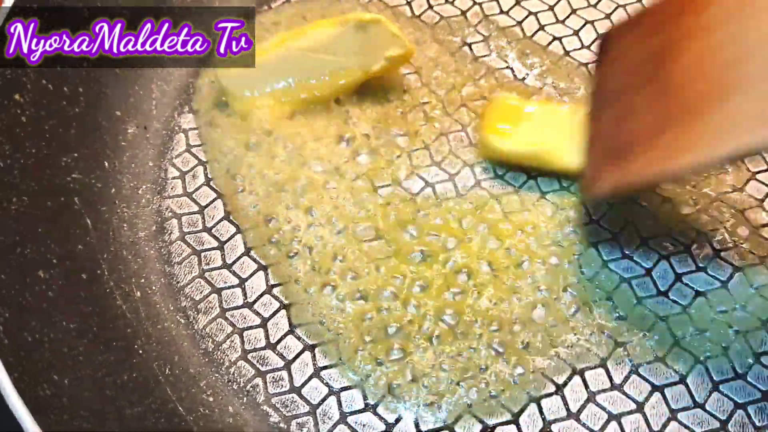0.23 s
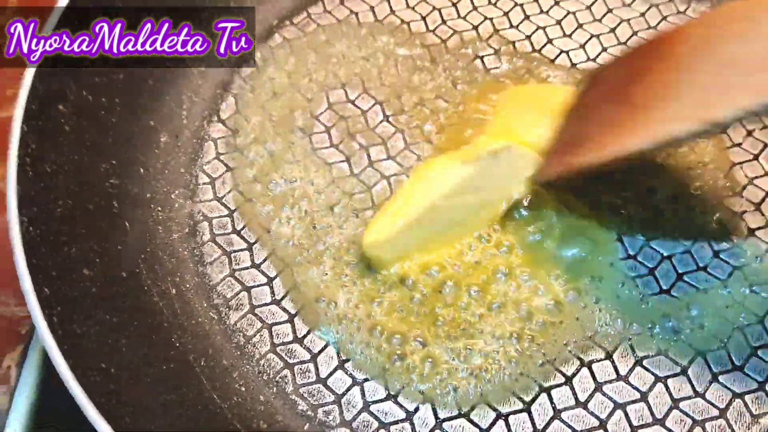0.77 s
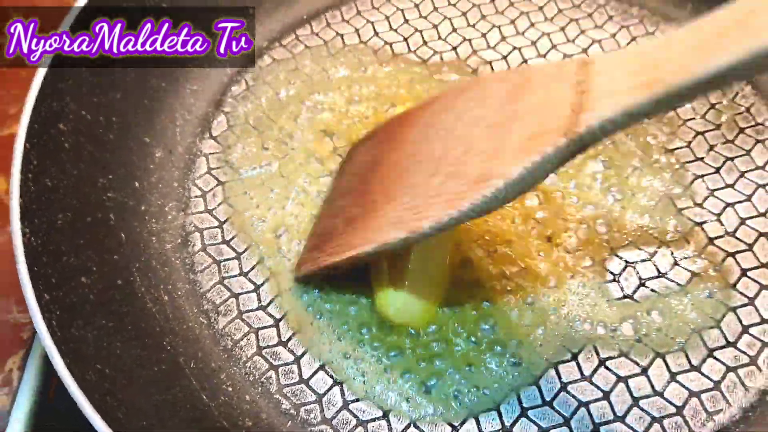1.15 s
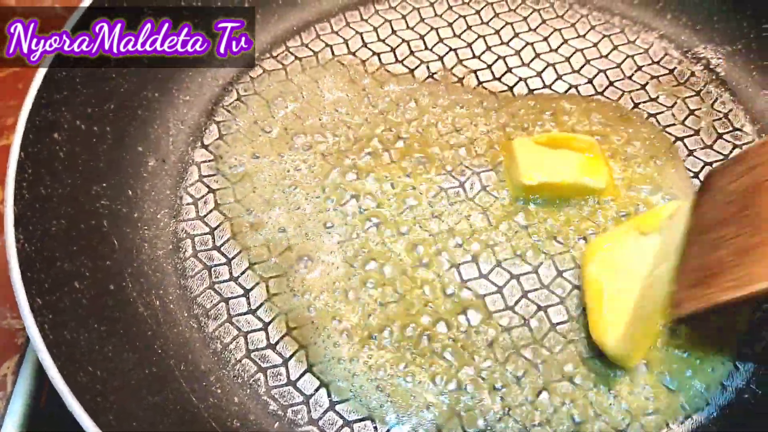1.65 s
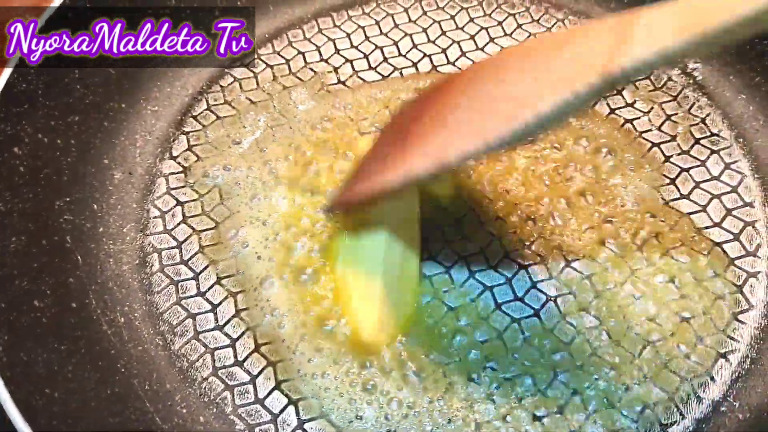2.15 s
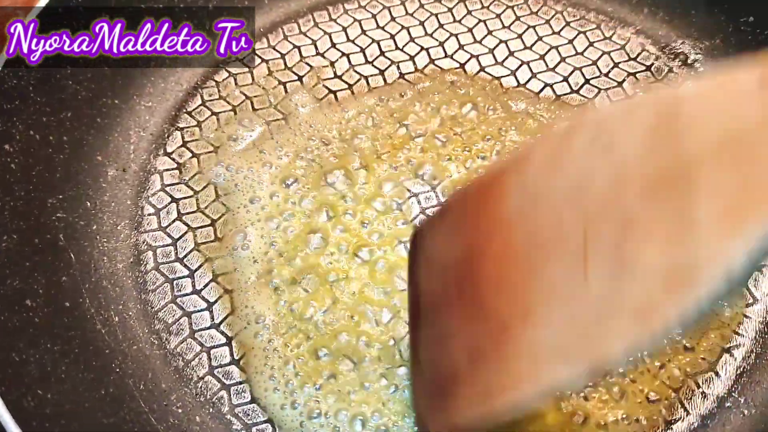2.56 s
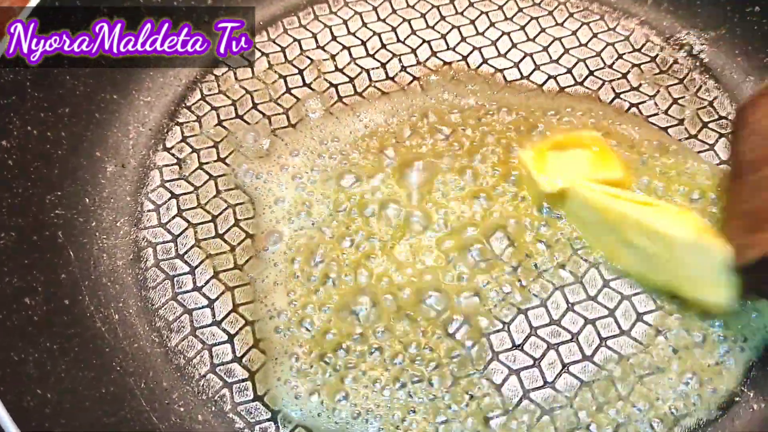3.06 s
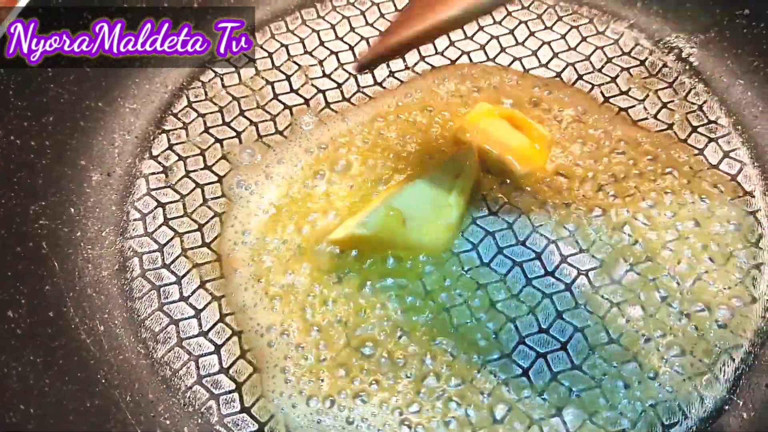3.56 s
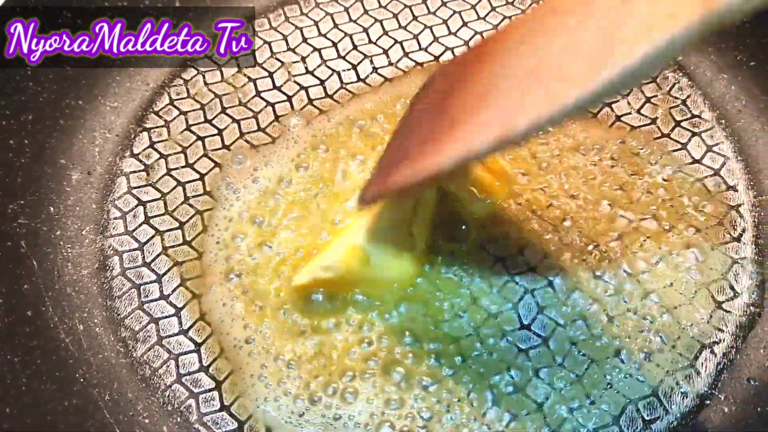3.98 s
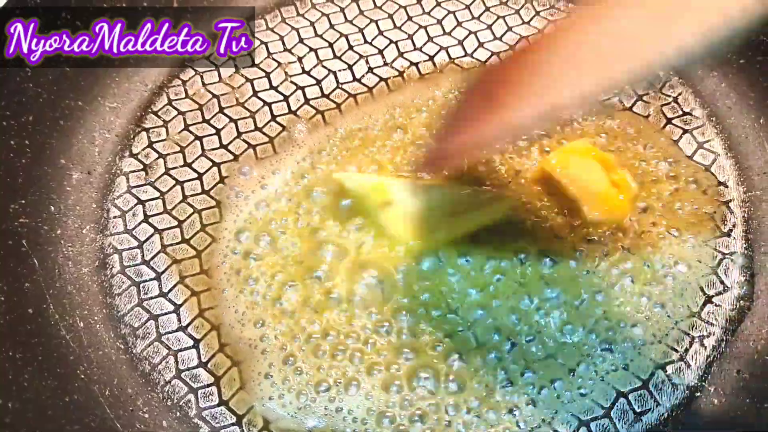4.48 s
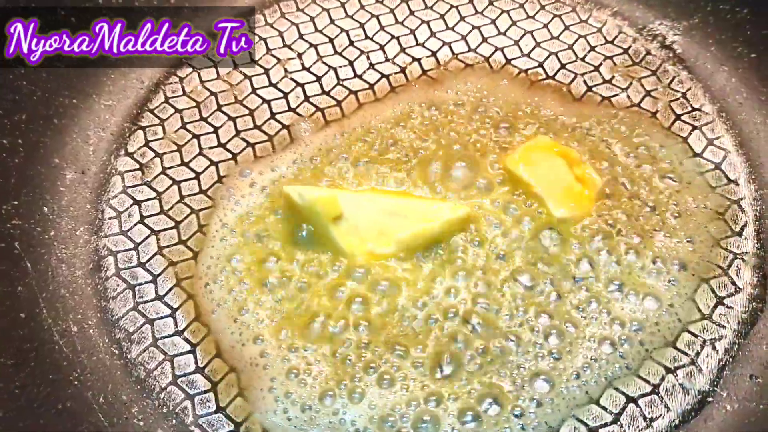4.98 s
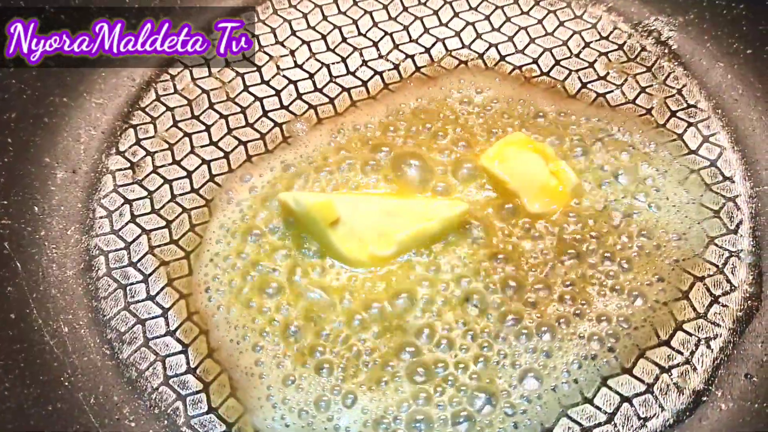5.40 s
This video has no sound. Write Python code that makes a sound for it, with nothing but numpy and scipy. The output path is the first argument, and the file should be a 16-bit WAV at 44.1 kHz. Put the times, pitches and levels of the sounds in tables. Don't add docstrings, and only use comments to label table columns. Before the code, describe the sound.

Butter sizzles loudly in a hot pan, gradually calming, while a wooden spatula rubs the metal and fat bubbles pop and spit.

```python
import sys
import numpy as np
from scipy import signal
from scipy.fft import rfft, irfft, next_fast_len
from scipy.io import wavfile
from scipy.ndimage import uniform_filter1d

SR = 44100
rng = np.random.default_rng(int(sys.argv[2]) if len(sys.argv) > 2 else 0)


def volts_from_db(level):
    exponent = np.asarray(level, float) / 20
    return 10 ** exponent


def master_out(mix):
    frames = np.transpose(np.atleast_2d(mix))
    ceiling = np.clip(frames, -1, 1)
    pcm = np.round(ceiling * 32767).astype(np.int16)
    wavfile.write(sys.argv[1], SR, pcm)


N = 248283
TIME_S = np.arange(N) / SR
LONG = next_fast_len(N)
HZ = np.fft.rfftfreq(LONG, 1 / SR)

# time in seconds, level in dB.
BOIL = [(0.03, -23.5), (0.44, -27), (1.05, -27.5), (1.3, -29), (1.5, -30), (1.76, -23.5), (1.92, -28),
        (2.17, -26), (2.34, -25), (2.45, -29), (2.8, -26.5), (3.2, -27.5), (3.55, -28), (4.02, -31),
        (4.33, -33.5), (4.73, -30), (4.85, -31.5), (5.63, -34)]
FULL_BOIL_DB = -24
# frequency in Hz, width in Hz, level in dB.
PAN_MODES = [(684.4, 38, -1), (609, 60, -17.5), (852, 79, 1.5), (1052, 73, 1.5), (1207, 130, -0.5),
             (1410, 450, -0.5), (1920, 180, 4.5)]


def evened(x):
    return x / np.sqrt(np.mean(x ** 2) + 1e-20)


def read(points, hz):
    f, value = np.transpose(points)
    return np.interp(np.log(hz + 1), np.log(f + 1), value)


def level_curve(rows):
    s, db = np.transpose(rows)
    return np.interp(TIME_S, s, db)


def hump(start, length, rise, fade):
    t = TIME_S - start
    return np.clip(t / rise, 0, 1) * np.exp(-np.maximum(t - length, 0) / fade)


def inside(rows, fade=0.02):
    edges = np.minimum(TIME_S - rows[0][0], rows[-1][0] - TIME_S) / fade
    return volts_from_db(level_curve(rows)) * np.clip(edges + 1.5, 0, 1)


def wander(count):
    return evened(uniform_filter1d(uniform_filter1d(rng.standard_normal(N), count), count))


def band(x, lo_hz, hi_hz):
    return signal.sosfilt(signal.butter(2, [lo_hz, hi_hz], "band", fs=SR, output="sos"), x)


def colour(x, db_at):
    hz = abs(np.fft.fftfreq(4096, 1 / SR))
    log_gain = np.log(volts_from_db(np.maximum(db_at(hz), -100)))
    taps = np.fft.ifft(np.exp(np.conj(signal.hilbert(log_gain)))).real[..., :2048]
    return signal.oaconvolve(x, np.atleast_2d(taps), axes=1)[:, :N]


def pair():
    # frequency in Hz, left-right likeness from 0 to 1.
    likeness = [(40, .97), (100, .92), (210, .93), (350, .76), (700, .55), (1300, .2), (3000, 0)]
    a, b = rfft(rng.standard_normal((2, LONG)))
    same = np.clip(read(likeness, HZ), -1, 1)
    return irfft(np.array([a, same * a + np.sqrt(1 - same ** 2) * b]), LONG)[:, :N]


def ring(x, modes):
    total = 0
    for hz, width_hz, db in modes:
        resonance = signal.lfilter(*signal.iirpeak(hz, hz / width_hz, SR), x)
        total = total + volts_from_db(db) * np.sqrt(1 / width_hz) * resonance
    return evened(total)


def scrape(modes, per_s, rough_db):
    slips = volts_from_db(rough_db * rng.exponential(1, N)) * (rng.random(N) < per_s / SR)
    return ring(pair() * (0.28 + evened(uniform_filter1d(slips, 30))), modes)


def pressure():
    # start in seconds, length in seconds, pressure in dB.
    strokes = [(-.05, 0.16, -34), (0.186, 0.28, -38.5), (0.49, .2, -37.5), (0.723, 0.13, -48),
               (0.918, 0.35, -41), (1.4, 0.14, -44), (1.574, 0.27, -36.5), (1.98, 0.21, -41.5),
               (2.304, 0.14, -43.5), (2.51, 0.37, -44), (2.748, 0.05, -42.5), (2.95, 0.28, -49),
               (3.45, 0.074, -43), (4.105, 0.15, -50), (4.504, 0.076, -49)]
    resting_db = -56.5
    return volts_from_db(resting_db) + sum(volts_from_db(db) * hump(s, length, rise=0.035, fade=0.1) for s, length, db in strokes)


def bursts(per_s, spread_db, lo_hz, hi_hz, cycles, count=16):
    size = volts_from_db(spread_db * np.minimum(rng.exponential(1, N), 3.6)) * rng.choice([-1, 1], N)
    size *= rng.random(N) < per_s / SR
    size /= np.sqrt(uniform_filter1d(size ** 2, 6000))
    patch = rng.integers(0, count, N)
    out, t, power = np.zeros((2, N)), np.arange(300) / SR, 1e-3
    for k, hz in enumerate(np.linspace(lo_hz, hi_hz, count)):
        turns = hz * t * (1 + 0.019 * hz * t)
        pop = np.sin(2 * np.pi * turns) * np.exp(-turns / cycles) * (1 - np.exp(-turns))
        pop /= np.linalg.norm(pop)
        power = power + abs(rfft(pop, LONG)) ** 2
        sound = signal.oaconvolve(size * (patch == k), pop)[:N]
        out += [sound, np.roll(sound, rng.integers(-30, 31))]
    return evened(irfft(rfft(out, LONG) / np.sqrt(power), LONG)[:, :N])


def bowl(x, t60, db):
    keep = volts_from_db(-120 / (t60 * SR))
    power = signal.lfilter([1 - keep], [1, -keep], x ** 2)
    return x + volts_from_db(db) * np.sqrt(power) * rng.standard_normal(x.shape)


def ports(x):
    # frequency in Hz, density in dB per Hz.
    cavity = [(880, -32.5), (1500, -12.5), (1740, -15.5), (3120, -7.5), (4780, -7.5), (5760, -8),
              (6790, 1.5), (10900, -10), (13300, -13), (14800, -11.5), (15400, -7.5)]
    # frequency in Hz, left-right difference in dB.
    balance = [(1500, -1), (4200, 0), (5500, 3), (6500, 8.5), (8000, 4), (10500, 5), (12000, 4),
               (13500, 12), (15400, 16.5)]
    return colour(x, lambda hz: read(cavity, hz) + np.outer([0.5, -0.5], read(balance, hz)))


def split(x, low_hz, high_hz):
    low = 1 / (1 + (HZ / low_hz) ** 20)
    high = 1 - 1 / (1 + (HZ / high_hz) ** 10)
    return [evened(irfft(rfft(x, LONG) * share, LONG)[:, :N]) for share in (low, 1 - low - high, high)]


def patchy(x, db):
    spectra = signal.stft(x, nperseg=512)[2]
    field = rng.standard_normal(spectra.shape[1:])
    field = evened(uniform_filter1d(uniform_filter1d(field, size=5, axis=0), size=10, axis=1))
    return evened(signal.istft(spectra * volts_from_db(db * field), nperseg=512)[1][:, :N])


def sizzle():
    # time in seconds, depth in dB.
    shading = [
        (1.16, 1),
        (2.19, 6),
        (2.875, 4),
        (3.93, -0.5),
        (4.98, -1),
    ]
    boil_db = level_curve(BOIL)
    level_db = boil_db - sum(db * hump(s, 0.0099, rise=0.0099, fade=0.12) for s, db in shading)
    top_db = 9 - 1.02 * TIME_S
    spread_db = 0.5 + 0.37 * (FULL_BOIL_DB - boil_db) + 0.2 * TIME_S
    stir_db = 2.5 * pressure() / pressure().max()
    froth_db = -34.5 + 0.77 * (level_db - FULL_BOIL_DB) + stir_db - 0.39 * TIME_S

    fizz = bursts(6000, np.clip(spread_db, 0, 7), lo_hz=1780, hi_hz=16420, cycles=1.7)
    hiss = 0.41 * rng.standard_normal((2, N))
    fizz = ports(bowl(fizz, t60=0.079, db=-0.5) + hiss)
    froth, body, top = split(fizz, 5550, 10600)

    flicker_db = 0.067 * wander(count=200) + 0.44 * wander(count=900)
    froth_flicker_db = 0.5 * flicker_db + 0.64 * wander(count=1500)
    top_flicker_db = 0.6 * flicker_db + (0.8 + 0.04 * TIME_S ** 2) * wander(count=300)
    froth = volts_from_db(froth_db + froth_flicker_db) * patchy(froth, 1.9)
    body = volts_from_db(level_db + flicker_db) * body
    top = volts_from_db(level_db + top_db + top_flicker_db) * top
    return volts_from_db(3.5) * (froth + body + top)


def kitchen():
    # frequency in Hz, density in dB per Hz.
    hum = [(15, -59), (25, -61), (48, -13), (79, -22), (175, -14.5), (208, 1), (300, -4.5), (350, -6),
           (441, -8), (477, -4.5), (556, -8), (802, -7), (850, -6.5), (1540, -10.5), (2500, -17.5),
           (3250, -13), (5500, -120)]
    # frequency in Hz, width in Hz, level in dB.
    hum_lines = [(53.7, 4.6, -63), (208.6, 6.1, -57), (363.7, 40, -50), (474.7, 8.8, -55.5),
                 (101, 5.4, -66.5), (251.2, 10.6, -53), (270.4, 12, -56.5)]
    rumble = evened(colour(pair(), lambda hz: read(hum, hz)))
    air = pair()
    lines = sum(volts_from_db(db + 41.5) * ring(air, [(hz, width_hz, 0)]) for hz, width_hz, db in hum_lines)
    calm_db = uniform_filter1d(FULL_BOIL_DB - level_curve(BOIL), size=12000)
    hum_db = -50 + 0.43 * calm_db + 0.17 * wander(count=4000)
    return volts_from_db(hum_db + 3.5) * (rumble + lines)


def rub():
    return pressure() * volts_from_db(-2.5) * scrape(PAN_MODES, 1500, rough_db=0.7)


def sing():
    until_s = 0.684
    dry_pan = hump(-1.004, 1 + until_s, rise=0.1, fade=0.03)
    return pressure() * volts_from_db(-7.5) * dry_pan * scrape(PAN_MODES[:1], 1500, rough_db=0.7)


def spits(count=200):
    s, chance, size, bright, side = rng.random((count, 5)).T
    s = s * N / SR
    per_s = 1.1 + 4.5 * s
    happens = chance < per_s * N / SR / count
    rows = np.transpose([s, -19 - 14 * (2 * size - 1), -17 + 15 * bright, 1.5 + 9 * side])
    return rows[happens]


def pops():
    # time in seconds, peak in dB, brightness in dB, left-right difference in dB.
    bubbles = [(0.5834, -11, -9, 7), (0.8824, -12, -11, 8), (1.3853, -7, -24, 5), (1.6484, -8, -13, 5.5),
               (2.1534, -9, -17, 6), (2.3316, 4, -73, 20), (2.7934, -5, -18, -5), (2.854, -14, -20, 1),
               (2.994, -9, -18, 2), (3.0284, -16, 6, 3), (3.171, 6, -14, 0), (3.7449, -5, -21, 8),
               (3.8661, -20, -12, 20), (4.004, -8, -7, -1), (4.1375, -20, -11, 8), (4.4233, -15, -15, 6.5),
               (4.487, -13, -17, 4), (4.5471, -16, -24, 9), (4.5697, -18, -3, 14), (4.7197, -8, -16, 10),
               (4.7541, -9.5, -18, 5), (4.9018, -12, -17, 3), (4.9706, -11, -4, 3), (5.032, -11, -20, 5),
               (5.0546, -8, -11, 6), (5.1134, -22, -1, 7), (5.2315, -11, -23, 1), (5.2955, -16, -6, 3),
               (5.3583, -14.5, -1, 2), (5.463, -15, 1, 4)]
    # time in seconds, peak in dB, left-right difference in dB.
    snaps = [(3.4595, -15, -2), (3.7868, -17, 9.0), (4.2194, -27, 3), (4.3644, -24, 6.5),
             (4.3725, -16, 7.5), (4.4464, -14, 6.5), (4.6483, -20, 6.5), (4.8209, -25, 8.0),
             (5.1298, -12, 11), (5.2154, -23, 7.0), (5.2679, -17, 11), (5.3914, -24, 8.0),
             (5.5113, -13, 8.0), (5.616, -11.5, 7)]
    thin = [(s, db - 19, 10, pan_db) for s, db, pan_db in snaps]
    loudest = volts_from_db(-5.5)
    out, t = np.zeros((2, N + 900)), np.arange(900) / SR
    decay = 0.4 * np.exp(-t / 0.0003) + 0.11 * np.exp(-t / 0.0035)
    for s, db, bright_db, pan_db in [*bubbles, *thin, *spits()]:
        spit = (t == 0) + rng.standard_normal((2, len(t))) * decay
        crack = 0
        for part_db, lo_hz, hi_hz in ((0, 6500, 7570), (10.5 + bright_db, 7700, 16000), (-29, 2800, 3500)):
            part = band(spit, lo_hz, hi_hz)
            crack = crack + volts_from_db(part_db) * part / abs(part).max(1, keepdims=True)
        gain = volts_from_db(db - 2.0 + np.array([[0.5], [-0.5]]) * pan_db)
        out[:, round(s * SR):][:, :len(t)] += np.minimum(gain, loudest / abs(crack).max()) * crack
    return out[:, :N]


def knock():
    # time in seconds, peak in dB.
    taps = [
        (1.2355, -23.5),
    ]
    # frequency in Hz, level in dB, 60 dB decay time in seconds.
    struck_modes = [(227, -3, 0.063), (348, 9, 0.045), (715, 14, 0.047), (840, 9, 0.035), (1070, -8, .03)]
    out, t = np.zeros(N), np.arange(5000) / SR
    tap = sum(volts_from_db(db - 60 * t / t60) * np.sin(2 * np.pi * hz * t) for hz, db, t60 in struck_modes)
    tap = band(tap * (1 - np.exp(-t / 0.00054)), 130, 3000)
    for s, db in taps:
        out[round(s * SR):][:len(t)] += volts_from_db(db) * tap / abs(tap).max()
    return out


def shift():
    # time in seconds, level in dB.
    shift_course = [
        (1.4, -56),
        (1.414, -42),
        (1.508, -43),
        (1.564, -39),
        (1.62, -48),
    ]
    # frequency in Hz, width in Hz, level in dB.
    shift_modes = [(295, 11, -1), (345, 81, -2)]
    return inside(shift_course) * scrape(shift_modes, 610, rough_db=0.0)


def drag():
    # time in seconds, level in dB.
    drag_course = [
        (5.38, -59),
        (5.428, -38.5),
        (5.514, -33),
        (5.528, -47),
        (5.536, -35.5),
        (5.588, -44),
        (5.63, -45),
    ]
    # frequency in Hz, width in Hz, level in dB.
    drag_modes = [(490, 84, 2), (595, 40, 4.5), (1024, 33, 7.5), (1395, 40, 2), (1770, 61, 5),
                  (1850, 62, 2), (2016, 24, 9), (2090, 80, -8), (2180, 80, -20)]
    return inside(drag_course) * scrape(drag_modes, 600, rough_db=1.5)


def tick():
    start_s, level_db, hz, t60_s = 5.4065, -29, 2750, 0.02
    t = np.maximum(TIME_S - start_s, 0)
    decay = volts_from_db(level_db - 60 * np.minimum(t / t60_s, 5))
    return decay * np.sin(2 * np.pi * hz * t) * (1 - np.exp(-t / 0.0006))


def scene():
    return sizzle() + kitchen() + rub() + sing() + pops() + knock() + shift() + drag() + tick()


def band_limit(x):
    return signal.sosfilt(signal.butter(12, 16870, fs=SR, output="sos"), x)


def record(dry):
    x = signal.sosfilt(signal.butter(2, 40, "high", fs=SR, output="sos"), dry)
    edge = signal.firwin(1023, 15490, window=("kaiser", 4), fs=SR)
    x = signal.oaconvolve(x, edge[None], "same")
    return band_limit(x)


dry = scene()
out = record(dry)
master_out(out)
```